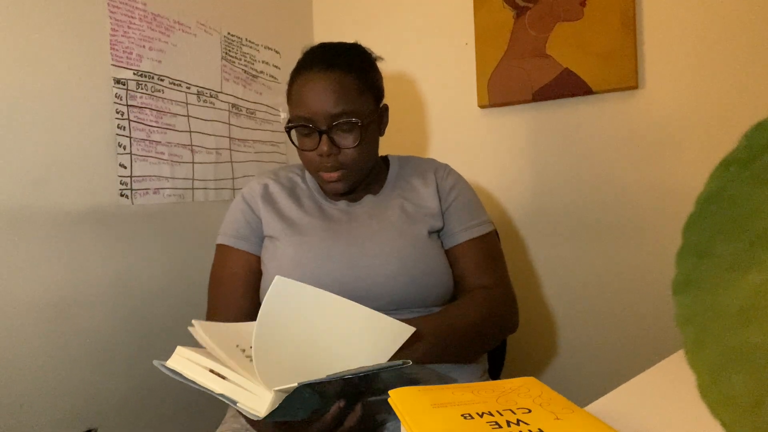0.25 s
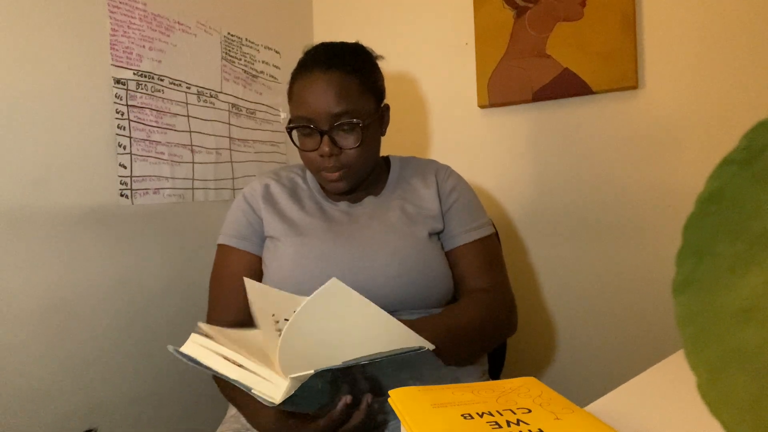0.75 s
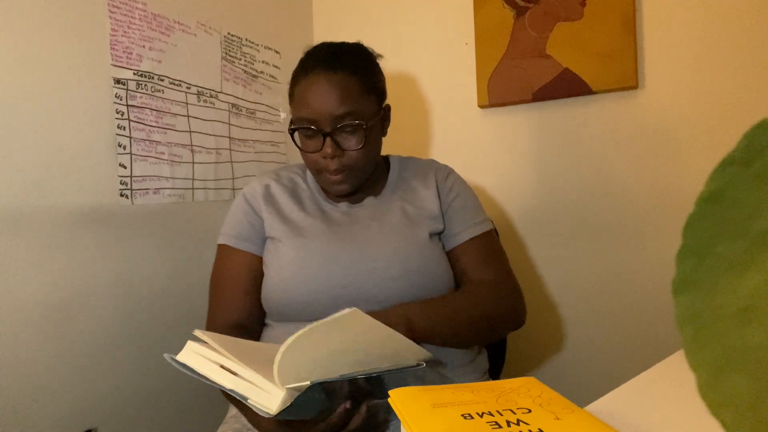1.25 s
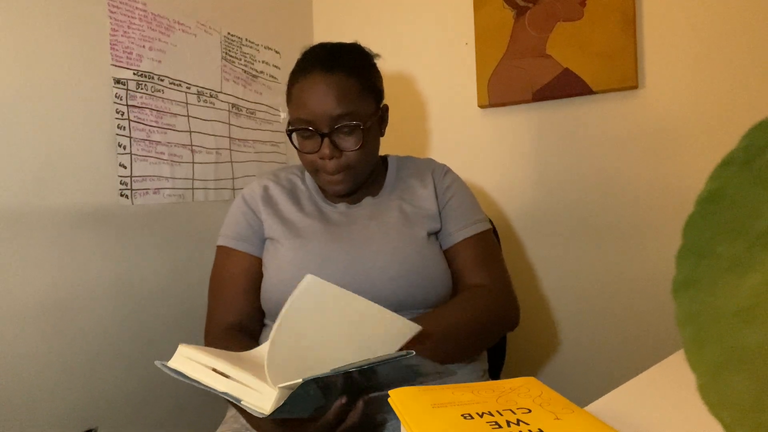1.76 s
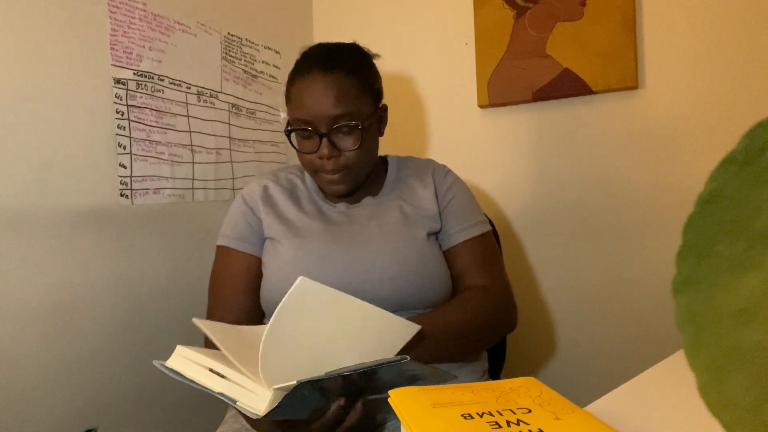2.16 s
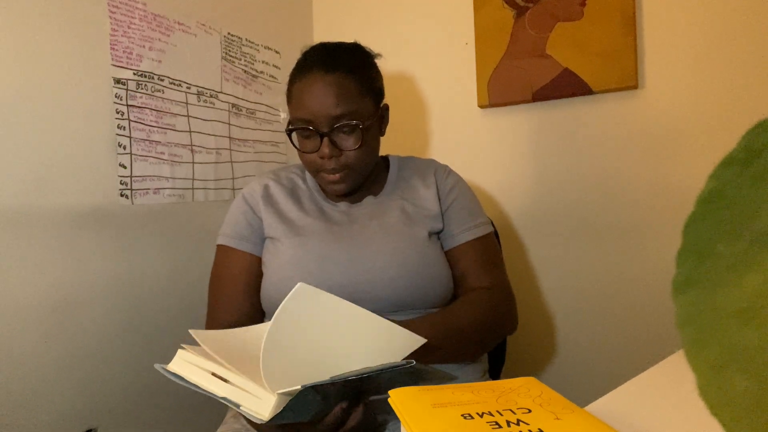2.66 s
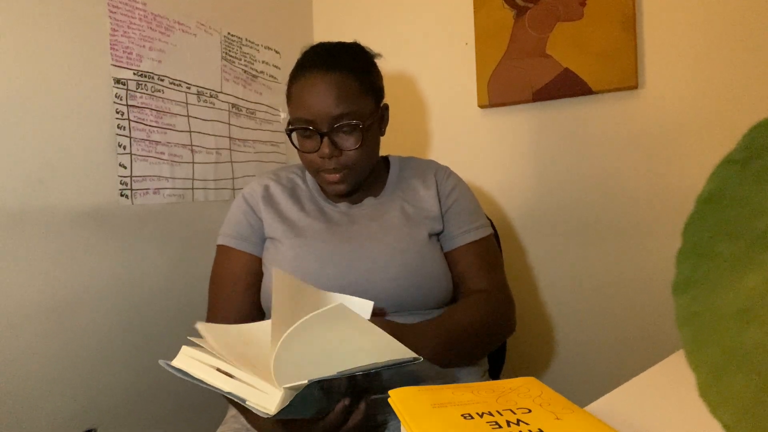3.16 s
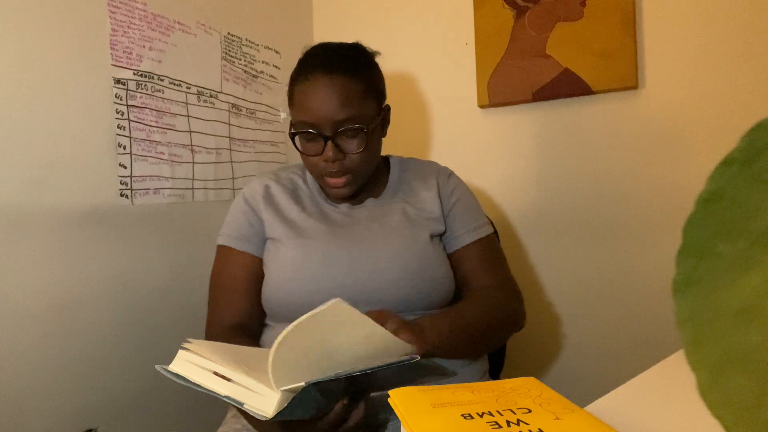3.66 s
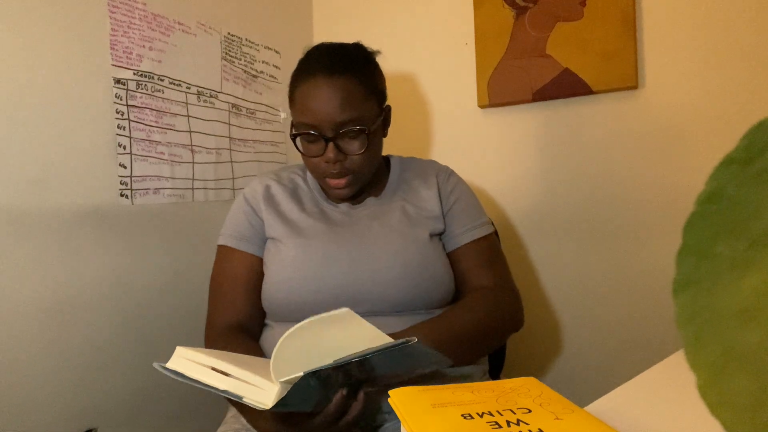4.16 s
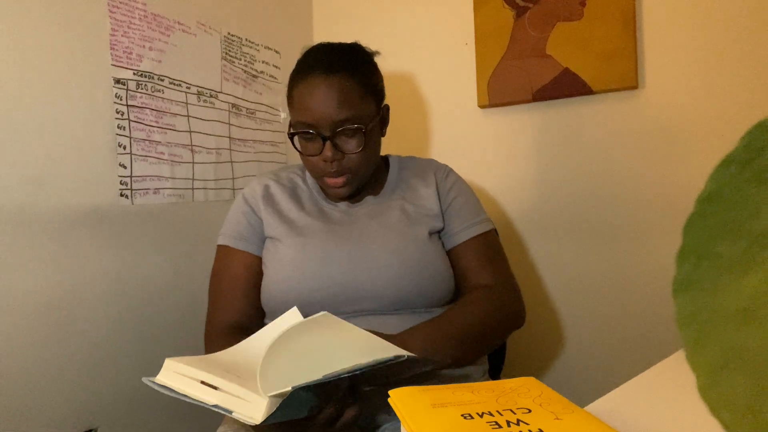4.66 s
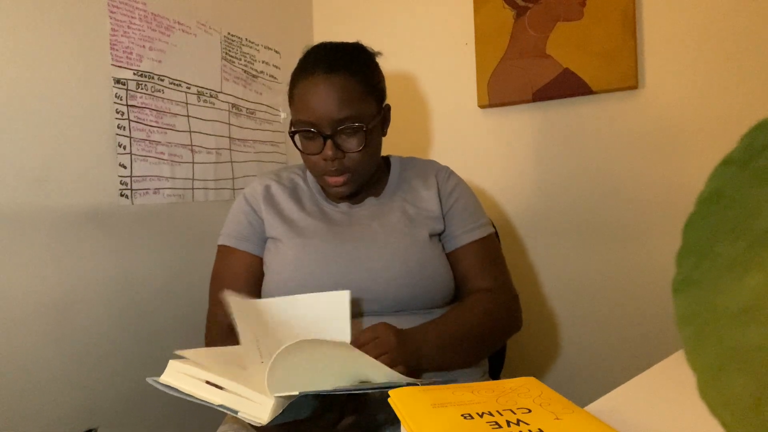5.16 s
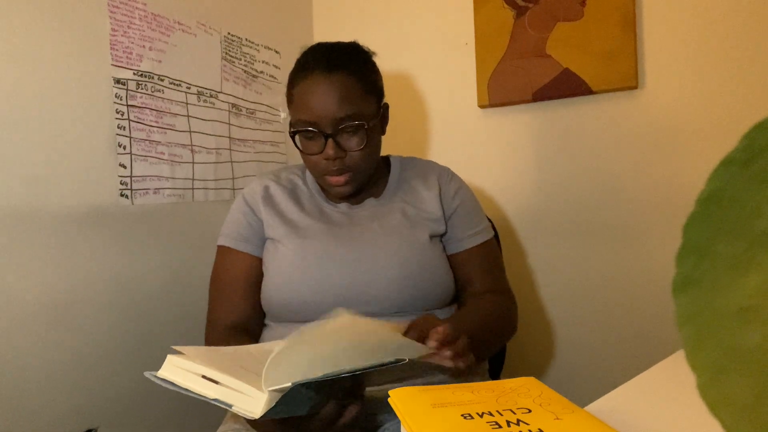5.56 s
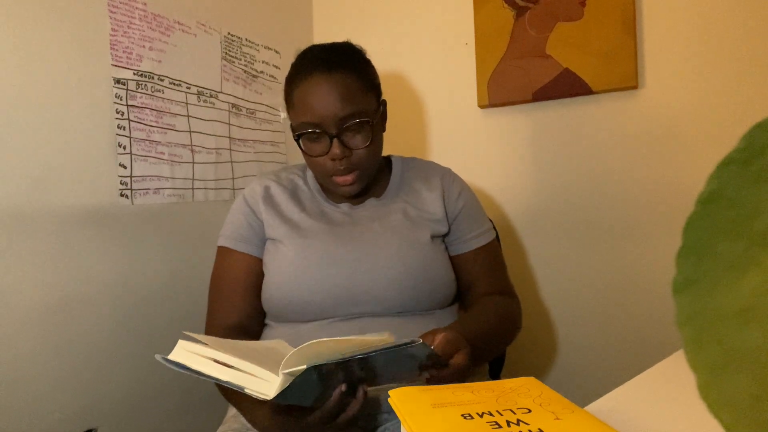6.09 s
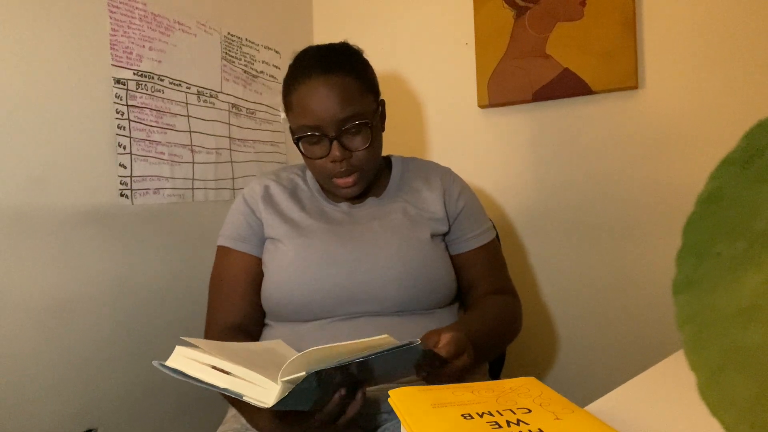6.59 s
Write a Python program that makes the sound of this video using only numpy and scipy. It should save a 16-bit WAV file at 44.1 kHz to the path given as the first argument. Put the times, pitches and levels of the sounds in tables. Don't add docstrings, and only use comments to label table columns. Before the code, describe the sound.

Pages of a hardcover book are thumbed and flipped close by in a small, dry furnished room. Crisp flicks, sharp snaps and papery rasps come in uneven bursts, with brief near-still gaps. Around the middle the paper goes almost quiet apart from faint finger brushes, then a busy burst of turns follows and fades to stillness. A low steady motor hum runs throughout; a phone hears it in close stereo.

```python
import sys
import numpy as np
from scipy import signal
from scipy.fft import rfft, irfft, next_fast_len
from scipy.io import wavfile
from scipy.ndimage import uniform_filter1d, map_coordinates

SR = 44100
rng = np.random.default_rng(int(sys.argv[2]) if len(sys.argv) > 2 else 0)


def int16_out(signal):
    q = np.round(np.clip(np.atleast_2d(signal).T, -1, 1) * 32767)
    wavfile.write(sys.argv[1], SR, q.astype(np.int16))


def ratio(d):
    e = np.asarray(d, float) / 20
    return 10 ** e


N = 301191


def unit(x):
    return x / np.sqrt(np.mean(x ** 2) + 1e-20)


def along(points, hz):
    f, v = np.transpose(points)
    return np.interp(np.log(hz + 1), np.log(f + 1), v)


def wobble(rate_hz):
    knots = rng.standard_normal(int(N / SR * 900) + 9)
    return map_coordinates(knots, [np.arange(N) * min(rate_hz, 900) / SR])


def filtered(x, response):
    m = next_fast_len(N + SR // 2)
    return irfft(rfft(x, m) * response(np.fft.rfftfreq(m, 1 / SR)), m)[..., :N]


def resonance(f, hz, width_hz, drive_hz):
    return 1j * f * drive_hz / (hz * hz - f * f + 1j * f * width_hz)


# f/Hz, t60/s
WALL_DECAY = [(200, 0.48), (1000, 0.048), (3000, 0.11), (10000, 0.035)]


def add(out, s, blow, wet_db):
    t = np.arange(SR // 4) / SR
    hz, frames_s, z = signal.stft(rng.standard_normal((2, len(t))), SR, nperseg=256)
    decay = ratio(-60 * frames_s / along(WALL_DECAY, hz)[:, None])
    tail = signal.istft(z * decay, nperseg=256)[1][:, :len(t)]
    tail = tail * (1 - np.exp(-(t / .007) ** 2))
    echo = signal.fftconvolve(blow[None], tail / np.linalg.norm(tail[0]), axes=1)
    direct = np.pad(blow, (0, len(t) - 1)) * np.array([[1], [.08]])
    heard = ratio(wet_db) * echo + direct
    span = out[:, round(s * SR):][:, :heard.shape[1]]
    span += heard[:, :span.shape[1]]


# f/Hz, density/(dB per Hz)
HISS_SPECTRUM = [(4000, -10.5), (6000, -1), (8000, 1.5), (10000, -3), (12500, -6.5), (14500, -10),
                 (15600, -26)]


def self_noise():
    tint = lambda hz: ratio(along(HISS_SPECTRUM, hz)) * (hz > 1000)
    return ratio(-99) * unit(filtered(rng.standard_normal((2, N)), tint))


# t/s, level/dB
HUM_LEVEL = [(0, -48.5), (2.4, -48.5), (2.8, -47), (3.75, -47), (4.0, -52), (4.15, -49.5), (4.7, -48.5),
             (5.0, -46.5), (5.52, -52), (5.8, -47.5), (6.15, -45), (6.45, -49), (6.7, -47.5), (6.83, -49.5)]
# t/s, depth/dB
HUM_DIPS = [(.21, 3.5), (.61, 3.5), (.93, 2), (1.2, 3), (1.65, 1.5), (2.0, 2.5), (2.52, 4), (3.33, 1.5),
            (3.67, 2), (3.86, 2), (4.06, 4.5), (4.75, 6), (5.88, 3.5), (6.03, 7.5), (6.49, 1.5)]
HUM_HZ, DIP_HALF_S = 58.57, 0.038


def hum():
    t = np.arange(N) / SR
    phase = 2 * np.pi * HUM_HZ * t + 0.36 * wobble(6.2)
    dip_db = sum(depth * np.exp(-((t - s) / DIP_HALF_S) ** 2) for s, depth in HUM_DIPS)
    level_db = np.interp(t, *np.transpose(HUM_LEVEL)) - dip_db
    port_db, port_rad = np.array([[1.5], [-1.7]]), np.array([[.12], [-.12]])
    return np.sqrt(2) * ratio(level_db + port_db) * np.sin(phase + port_rad)


# f/Hz, density/(dB per Hz)
AIR_SPECTRUM = [(20, -32.5), (40, 2.5), (75, 0.5), (140, -1.5), (212, -2.5), (300, -6), (600, -18.5),
                (1400, -39.5), (4000, -58), (15000, -39)]
GENTLE_DB = -61.5
ROOM_DB, ROOM_FOLLOWS, ROOM_LAG_S = -64, 0.12, 0.097


def room_tone():
    s, layers = strokes()
    lag = np.exp(-(np.arange(-1, 1.001, .001) / ROOM_LAG_S) ** 2)
    busy_db = signal.fftconvolve(layers[3] - GENTLE_DB, lag, "same")
    busy_db = busy_db / (ROOM_LAG_S * 1000 * np.sqrt(np.pi))
    level_db = ROOM_DB + ROOM_FOLLOWS * np.interp(np.arange(N) / SR, s, busy_db)
    return ratio(level_db + 2.0) * rub(AIR_SPECTRUM, grain_db=2.0, grain_rate_hz=17, patchy_db=2.0)


# t/s, peak/dB, f/Hz
BUMPS = [
    (0.569, -45, 104),
    (1.048, -49.5, 208),
    (1.26, -50, 195),
    (3.135, -53, 223),
    (3.396, -43.5, 217.4),
    (3.701, -43, 110),
    (5.059, -50, 115),
    (5.91, -42.5, 198.4),
    (5.95, -47, 242),
    (6.238, -50, 108),
]


def bumps():
    out, t = np.zeros(N + SR), np.arange(SR // 3) / SR
    for s, db, hz in BUMPS:
        ring = np.sin(2 * np.pi * hz * t)
        ring += 0.77 * np.sin(2 * np.pi * 0.723 * hz * t + rng.uniform(0, 9.5))
        out[round(s * SR):][:len(t)] += ratio(db - 2.5 - 60 * t / 0.2) * (1 - np.exp(-t / 0.0083)) * ring
    return out[:N] * np.array([[1], [.6]])


# t/s, length/s, level/dB, f/Hz
SINGS = [
    (.345, 0.092, -46, 1060),
    (1.159, 0.034, -54, 947),
    (0.436, 0.024, -49, 4320),
    (0.542, 0.052, -54, 1900),
    (1.992, .15, -49.5, 1890),
    (2.004, 0.1, -53.5, 2530),
    (3.151, .06, -54.5, 2256),
    (4.87, 0.12, -51.5, 1894),
    (5.05, 0.086, -52, 1160),
]


def sings():
    out, t = np.zeros((2, N)), np.arange(8192) / SR
    f = np.fft.rfftfreq(len(t), 1 / SR)
    for s, length_s, db, hz in SINGS:
        band = resonance(f, hz, .1 * hz, .1 * hz) ** 2
        swell = np.sin(np.pi * np.clip(t / length_s, 0, 1)) ** .5
        tone = unit(irfft(rfft(rng.standard_normal(len(t))) * band))
        add(out, s, ratio(db) * swell * tone, wet_db=-3.5)
    return out


# t/s, peak/dB, centre f/Hz, t60/s
SLIPS = [(0.051, -37.5, 1520, 0.057), (0.314, -41.5, 750, 0.092), (0.509, -30, 1900, 0.032),
         (0.682, -30.5, 1100, 0.053), (0.777, -26, 3920, 0.032), (0.779, -30.5, 960, 0.03),
         (0.969, -50, 900, 0.037), (1.067, -37.5, 955, 0.046), (1.978, -47, 4240, 0.067),
         (2.523, -37.5, 810, 0.028), (2.571, -24, 4200, 0.036), (2.672, -37, 1200, 0.11),
         (2.721, -39, 750, 0.062), (2.775, -40, 1220, 0.086), (2.825, -24.5, 6500, 0.0908),
         (3.184, -35.5, 610, 0.044), (3.375, -35, 890, 0.16), (3.501, -32, 860, 0.067),
         (3.671, -29.5, 900, 0.083), (3.714, -30.5, 1010, 0.06), (4.08, -57, 525, 0.04),
         (4.493, -48, 1155, 0.036), (4.616, -37, 4500, 0.1), (4.833, -31, 6650, 0.052),
         (4.855, -40, 3170, 0.0346), (5.087, -28, 1260, 0.074), (5.203, -27.5, 1320, 0.059),
         (6.073, -43, 3710, 0.04537), (6.211, -53, 8350, 0.0457)]
# t/s, peak/dB, centre f/Hz, broad share/dB, t60/s
BRUSHES = [
    (3.96, -68, 1690, 2, 0.14),
    (4.1263, -59.5, 1510, 8.5, 0.1004),
    (4.2473, -59.5, 1680, 2, 0.19),
    (4.3842, -61.5, 2330, -2, 0.26),
    (4.4406, -63, 2960, -26, 0.12),
    (5.839, -53, 2380, 1, 0.15),
]
SLIP_BROAD_DB = -13


def slips():
    out, t = np.zeros((2, N)), np.arange(4096) / SR
    f = np.fft.rfftfreq(len(t), 1 / SR)
    slaps = [(s, db, hz, SLIP_BROAD_DB, t60) for s, db, hz, t60 in SLIPS]
    for s, db, hz, broad_db, t60 in slaps + BRUSHES:
        colour = resonance(f, hz, 0.18 * hz, .35 * hz)
        noise = rng.standard_normal((2, len(t)))
        scrape = unit(irfft(rfft(noise[0]) * colour)) + ratio(broad_db) * noise[1]
        add(out, s, ratio(db - 9 - 60 * t / t60) * (1 - np.exp(-t / 0.00079)) * scrape, wet_db=-3.5)
    return out


# t/s, peak/dB, first f/Hz, last f/Hz, t60/s
SNAPS = [(.5455, -23, 12000, 720, .014), (.9430, -31, 3000, 900, .018), (2.2558, -37, 3000, 800, .015),
         (2.3740, -34, 4000, 1100, .008), (3.0862, -28.5, 13000, 900, .008), (3.1369, -23, 14000, 950, .01),
         (3.4011, -27, 2500, 550, .007), (4.7268, -44, 3000, 1200, .012), (4.7941, -27, 5000, 900, .007),
         (4.9954, -33, 2500, 900, .008), (4.9973, -26, 7000, 750, .009), (5.0357, -29, 3200, 900, .02),
         (5.6930, -54, 15000, 3000, .004), (6.7140, -58, 4600, 3900, .009)]


def snaps():
    out, t = np.zeros((2, N)), np.arange(1500) / SR
    for s, db, first_hz, last_hz, t60 in SNAPS:
        turns = last_hz * t + (first_hz - last_hz) * .0003 * (1 - np.exp(-t / .0003))
        overtone = np.sin(2 * np.pi * rng.uniform(1.9, 2.7) * last_hz * t)
        ring = np.sin(2 * np.pi * turns) + .45 * overtone
        add(out, s, ratio(db + 5 - 60 * t / t60) * (1 - np.exp(-t / .0005)) * ring, wet_db=-8)
    return out


def snap_dips():
    gain, t = np.ones(N), np.arange(900) / SR
    for s, *_ in SNAPS:
        gain[round(s * SR):][:len(t)] *= 1 - .65 * np.exp(-(t / .009) ** 2)
    return gain


def held(hold_s, ahead_s):
    releases = [(row[0], .0005) for row in SNAPS] + [(row[0], .005) for row in SLIPS]
    s, ramp_s = np.transpose(sorted(releases))
    apart = np.diff(s, prepend=-1) > hold_s + ahead_s
    s, ramp_s = s[apart], ramp_s[apart]
    now = np.transpose([s - hold_s, s - ramp_s, s + ramp_s, s + ahead_s]).ravel()
    hand = np.transpose([s - hold_s, s - hold_s, s + ahead_s, s + ahead_s]).ravel()
    return np.interp(np.arange(N) / SR, [0, *now, 9], [0, *hand, 9])


# peak t/s, rasp/dB, fade/(s per 20 dB), bend/dB, edge hiss/dB
FLICKS = [(0.318, -56, -1.35, -0.5, -9.5), (0.552, -46.5, 0.1032, 7.5, 0.5), (0.779, -47.5, 0.07, 2, -8),
          (.95, -51, 0.08, 7, -4.5), (0.969, -50, .17, -2.5, -3.5), (1.33, -63.5, 0.53, -2.5, 4),
          (2.572, -44.5, 0.067, 0.5, -1.5), (3.14, -45, 0.0325, 5.5, -7.5), (3.58, -55.5, 0.0053, 3, -25),
          (3.65, -66, 0.23, 7, 7.5), (3.819, -65, 0.07, -3, -1), (4.39, -79.5, -3.5, -22, -5),
          (4.618, -50, 0.04, -0.5, -0.5), (4.65, -60, 0.22, -7.5, -6.5), (5.038, -43, 0.107, 9.5, -24.5),
          (5.06, -55, 0.1234, -2, -6.5), (5.165, -52.5, 0.07, 7, -2), (5.572, -61, 0.13, -2.5, -5.5),
          (5.696, -74, .05, -10.5, 13), (6.061, -67, 0.06, -1.5, -2.5), (6.088, -54.5, 0.0568, -5.5, -5),
          (6.13, -65, 0.09, -5, -4.5), (6.218, -47.5, 0.0161, -5, -1.5), (6.71, -84, .14, -8, -8)]
# start t/s, hold/s, rasp/dB, flutter over it/dB, air push over it/dB
SLIDES = [(0.373, 0.097, -44.5, -5.5, -7), (0.818, 0.19, -57.5, -2.5, -1.5), (1.2, 0.081, -60.5, -7, 2.5),
          (1.998, .11, -50, 1, -4), (2.678, 0.02, -48, -3, -3), (2.78, .03, -50, -3, -10),
          (2.83, 0.2, -50, -3.5, -0.5), (3.09, 0.053, -61, 3, 15.5), (3.19, 0.27, -57.5, -1, 0),
          (3.673, 0.067, -61.5, 5, 11.5), (4.849, 0.1, -54, -5, -0.5), (5.08, 0.045, -54, 4.5, 9),
          (6.239, 0.017, -59, -2, -8)]
# peak t/s, rasp/dB, rise/(s per 20 dB), fade/(s per 20 dB), bend/dB
SWELLS = [(0, -55.5, .1, 0.14, 3.5), (.14, -67, 0.38, 0.44, 3), (2.38, -58.5, 0.042, 0.04, 13),
          (0.718, -49, 0.089, 0.073, 4.5), (1.071, -63, 0.087, 0.052, 14.5),
          (1.272, -56.5, 0.14, 0.07, 3.5), (2.3, -53, .12, 0.11, 2), (4.91, -49, 0.099, 0.14, -6.5),
          (5.7, -88, 0.23, .6, 16.5), (1.79, -65.5, 0.27, 0.084, 2), (2.45, -64, 0.078, 0.15, 6.5),
          (2.87, -42.5, 0.1, 0.14, -9), (3.4, -56.5, 0.055, 0.079, 7.5), (3.53, -62, 0.15, 0.16, 8.5),
          (4.15, -78.5, 0.43, 0.31, 4), (4.51, -79.5, 0.09, 0.12, 16), (4.8, -73.5, 0.12, 0.0874, 20),
          (5.004, -56, .01, 0.037, 7.5), (5.32, -58.5, 0.51, 0.23, 3), (5.501, -57.5, 0.076, 0.063, 6.5),
          (5.84, -64.5, 0.1, 0.083, -10)]
# t/s, half width/s, depth/dB
HALTS = [(1.14, 0.061, 9.5), (1.929, 0.02, 11), (2.225, 0.02, 16.5), (2.54, 0.021, 13), (2.815, 0.0063, 9),
         (3.62, 0.012, 2), (4.04, 0.021, 13), (4.35, 0.025, 0), (4.56, 0.026, 6), (4.7, 0.017, 5),
         (5.025, 0.0073, 4), (5.08, 0.01, 9), (5.19, 0.0091, 5.5), (5.74, 0.086, 6.5), (5.99, 0.052, 6),
         (6.38, 0.048, 5)]
HALT_SHARES = 0.92, 1.2, .7, 0.24
REST_DB = -99, -106, -88.5, -85.5
FLUTTER_BENDS, PUSH_BENDS = 0.79, 0.92
EDGE_DB, EDGE_FALLS = -0.8, 0.34
FLICK_RISE_S, SLIDE_RISE_S, SLIDE_FADE_S = 0.024, 0.028, 0.07
ROUNDING = 1.247


def strokes():
    edge = lambda db: EDGE_DB - EDGE_FALLS * max(db - GENTLE_DB, 0)
    bent = lambda bend: (FLUTTER_BENDS * bend, PUSH_BENDS * bend)
    rows = [(s, 0, db, FLICK_RISE_S, fade, hiss, *bent(bend)) for s, db, fade, bend, hiss in FLICKS]
    rows += [(s, hold, db, SLIDE_RISE_S, SLIDE_FADE_S, edge(db), *lifts) for s, hold, db, *lifts in SLIDES]
    rows += [(s, 0, db, rise, fade, edge(db), *bent(bend)) for s, db, rise, fade, bend in SWELLS]
    s, hold, db, rise, fade, *lifts = np.transpose(rows)[..., None]
    t = np.arange(N * 1000 // SR + 2) / 1000
    before = np.maximum((s - t) / np.abs(rise), 0)
    after = np.maximum((t - s - hold) / np.abs(fade), 0)
    level_db = db - 20 * (before + after) ** ROUNDING
    still_db = sum(depth * np.exp(-((t - at) / half) ** 2) for at, half, depth in HALTS)
    layers = []
    for lift, share, rest in zip((0, *lifts), HALT_SHARES, REST_DB):
        power = (ratio(level_db + lift - share * still_db) ** 2).sum(0)
        layers.append(10 * np.log10(power + ratio(rest) ** 2))
    return t, layers


def crackle(rate_hz, level_db):
    chance, size = rng.random(N), rng.laplace(size=N)
    return ratio(level_db) * unit((chance < rate_hz / SR) * size) * np.array([[1], [-.3]])


def rub(spectrum, grain_db, grain_rate_hz, patchy_db, clicks=0):
    clumps = ratio(grain_db * wobble(grain_rate_hz) + 0.57 * grain_db * wobble(45))
    z = signal.stft(clumps * rng.standard_normal((2, N)), nperseg=512)[2]
    field = uniform_filter1d(rng.standard_normal(z.shape[1:]), size=3, axis=0)
    field = uniform_filter1d(field, size=12, axis=1)
    patchy = signal.istft(z * ratio(patchy_db * unit(field)), nperseg=512)[1][:, :N]
    pair = unit(patchy) + clicks
    return unit(filtered(pair, lambda hz: ratio(along(spectrum, hz) - 80 * (hz < spectrum[0][0]))))


# f/Hz, density/(dB per Hz)
RASP_SPECTRUM = [(1500, -28), (2400, -2.5), (3200, 0.5), (4100, -1), (5200, -3.5), (6500, -6), (9000, -37)]
FLUTTER_SPECTRUM = [(700, -53), (1100, -1.5), (1300, 1), (1550, 0), (1950, 0.5), (2600, -1.5),
                    (4000, -31.5)]
PUSH_SPECTRUM = [(150, -31), (300, -2.5), (500, -3.5), (750, -2.5), (1000, -0.5), (1200, -12.5),
                 (1800, -45)]


def pages():
    s, layers = strokes()
    hand = held(hold_s=0.019, ahead_s=0.011)
    rasp_db, hiss_db, flutter_db, push_db = [np.interp(hand, s, c) for c in layers]
    fine, coarse = crackle(rate_hz=700, level_db=-8), crackle(rate_hz=300, level_db=-8)
    rasp = rub(RASP_SPECTRUM, grain_db=0.0, grain_rate_hz=360, patchy_db=3.5, clicks=fine)
    hiss = rub(HISS_SPECTRUM, grain_db=-1.0, grain_rate_hz=200, patchy_db=4.5, clicks=fine)
    flutter = rub(FLUTTER_SPECTRUM, grain_db=1.0, grain_rate_hz=200, patchy_db=2.5, clicks=coarse)
    push = rub(PUSH_SPECTRUM, grain_db=2.5, grain_rate_hz=120, patchy_db=3.5, clicks=coarse)
    bright = ratio(rasp_db + 1.5) * rasp + ratio(hiss_db + 3.0) * hiss
    dull = ratio(flutter_db - 0.67) * flutter + ratio(push_db - 2.0) * push
    return bright + dull


# f/Hz, width/Hz
BOOK_MODES = [(212, 8.3), (529, 3.6), (587, 6.4), (706, 2), (734, 5.6), (915, 18.5), (1010, 3.9),
              (1166, 27), (1276, 25), (1346, 12), (1750, 14.5), (1911, 30), (2038, 19), (2161, 16),
              (3010, 13)]


def ringing(x, ring_db):
    return filtered(x, lambda f: 1 + sum(ratio(ring_db) * resonance(f, c, w, w) for c, w in BOOK_MODES))


# f/Hz, correlation/ratio
ALIKE = [(50, 0.83), (200, 0.67), (800, 0.21), (1500, 0.1615), (2800, 0.069), (4000, 0.53), (5600, 0.038),
         (7000, 0.25), (8000, 1), (9300, 0.88), (10500, 1), (11800, 0.54), (13100, 0.54), (14100, .55),
         (15300, 0.853)]
# f/Hz, lead/cycles
LEAD = [(0, 0), (1200, .06), (2600, -.1), (4000, 0), (5600, .45), (6400, .82), (8000, 1), (10500, 1.5),
        (13100, 2), (15200, 2.5)]


def ports(pair):
    turn = lambda hz: np.arccos(np.clip(along(ALIKE, hz), -1, 1)) / 2
    shared, apart = filtered(pair, lambda hz: np.array([np.cos(turn(hz)), np.sin(turn(hz))]))
    sides = np.array([[1], [-1]])
    lead = lambda hz: np.exp(1j * np.pi * np.interp(hz, *np.transpose(LEAD)) * sides)
    return filtered(np.array([shared + apart, shared - apart]), lead)


def scene():
    air = room_tone()
    paper = ringing(snap_dips() * pages() + air, ring_db=1.5)
    return ports(paper + snaps() + slips() + bumps() + sings() + self_noise()) + hum()


def roll_off(x):
    return signal.sosfilt(signal.butter(12, 15650, fs=SR, output="sos"), x)


def record(dry):
    return roll_off(dry)


dry = scene()
out = record(dry)
int16_out(out)
```